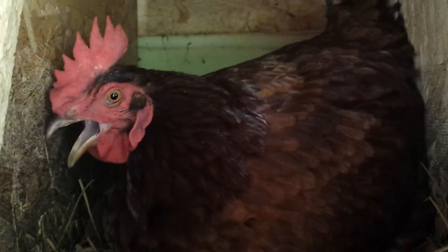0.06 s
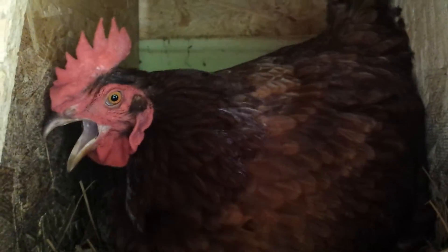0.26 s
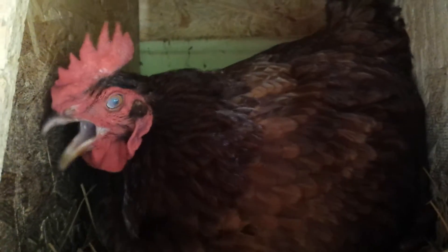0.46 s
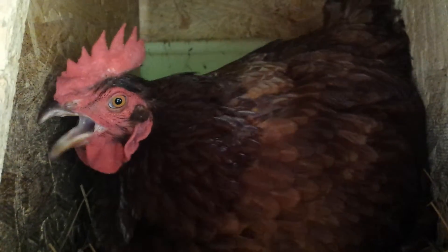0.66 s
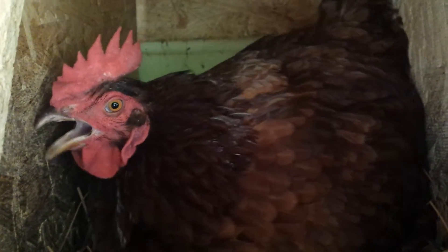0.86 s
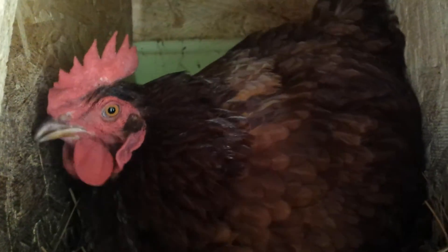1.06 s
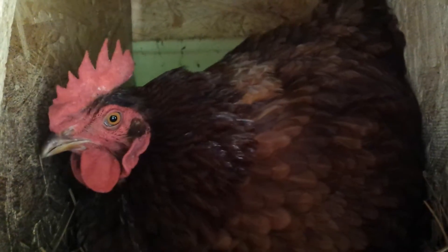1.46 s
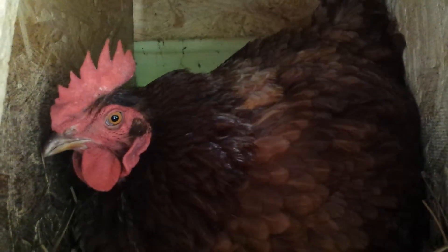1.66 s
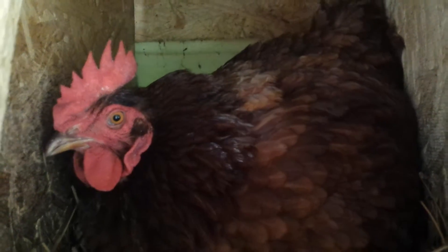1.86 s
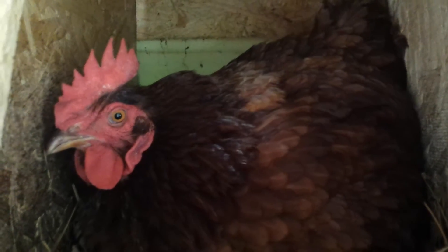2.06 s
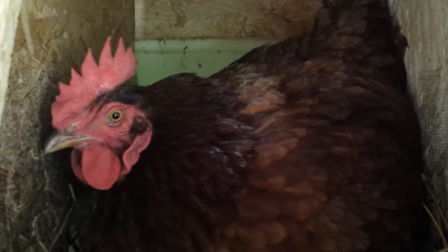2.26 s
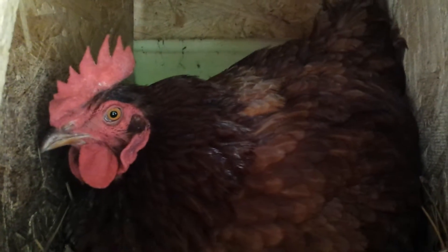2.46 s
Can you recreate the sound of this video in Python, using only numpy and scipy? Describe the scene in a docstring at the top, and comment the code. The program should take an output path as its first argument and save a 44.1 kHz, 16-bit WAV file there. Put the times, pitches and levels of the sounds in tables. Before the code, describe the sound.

A hen close to the microphone gives one long shrill squawk that grows louder, steps down in pitch and breaks into a rasp and a hiss at about 1 second. Short rattling clucks follow from 1.2 to 1.6 seconds. Near 1.8 seconds straw crackles faintly and she bumps softly against the wooden box. A thin soft whine runs from 1.9 to 2.5 seconds. A faint low throb lies underneath.

```python
"""Hen in a nest box

Close on a stereo microphone, a hen on straw in a wooden box gives one long shrill squawk. The tone of
her syrinx steps down in pitch, cracks into pulses and ends in a rasp and a hiss of breath. She clucks
in short rattles, then starts a thin soft whine. Straw rustles as she shifts; a low throb runs beneath."""
import sys
import numpy as np
from scipy import signal
from scipy.fft import rfft, irfft, next_fast_len
from scipy.io import wavfile
from scipy.ndimage import uniform_filter1d, map_coordinates

SR = 44100
rng = np.random.default_rng(int(sys.argv[2]) if len(sys.argv) > 2 else 0)


def dump_mix(stems):
    """Bounce the given channels to the path in sys.argv[1] as a 16-bit WAV at rate SR."""
    frames = np.atleast_2d(stems).T  # one column per channel
    limited = np.clip(frames, -1, 1)  # hard clip at full scale
    pcm = np.round(limited * 32767).astype(np.int16)
    wavfile.write(sys.argv[1], SR, pcm)


N = 110250
T = np.arange(N) / SR

# Pace of the throb: t/s, rate/Hz
THROB_RATE = [(0,9.25),(.9,9.25),(1.5,8.6),(2.5,7.7)]
# Its two modes: t/s, lower relative level/dB, upper relative level/dB
THROB_LEVELS = [(.75,-48.5,-50.5),(1.199,-53.5,-62.5),(2.4,-49.5,-62.5)]
# Their ring: f/Hz, t60/s
THROB_MODES = [(65,0.22),(100,0.38)]
# Background hiss: f/Hz, relative level/dB
FLOOR_COLOUR = [(25,-25),(80,-16.5),(400,-28),(1900,-35),(15500,-43.5)]
# Fundamental of the squawk: t/s, f/Hz, level/dB
SQUAWK_TONE = [(0.02,1224,-37),(0.022,1255,-27.5),(.055,1299,-31.5),(.07,1400,-39),(0.149,1626,-39),(0.184,1504,-31.5),(0.206,1418,-43),
               (0.234,1350,-20.5),(0.259,1415,-27),(.272,1379,-21),(0.285,1413,-37.5),(0.293,1391,-20),(0.337,1315,-19.5),(0.388,1254,-27),(0.408,1276,-19),(0.488,1334,-26.5),(0.541,1194,-18.5),
               (0.547,1048,-13.5),(.585,1075,-11),(0.616,1126,-15.5),(0.632,1161,-24),(.664,1113,-14),(0.683,1166,-26),(.708,1089,-12),(0.737,1130,-28.5),(0.759,1132,-18.5),(0.818,1036,-10.5),(0.829,1038,-23),
               (0.842,1077,-17.5),(.848,699,-21),(0.852,852,-17),(0.868,836,-15),(0.869,1043,-17.5),(0.879,765,-21),(0.889,1093,-11),(0.913,1040,-13.5),(0.919,1016,-59),(0.927,841,-26.5),(0.94,558,-25)]
# Its overtones: t/s, second harmonic level/dB, upper harmonics base level/dB
SQUAWK_EDGE = [(.02,-57.5,-55),(.033,-28,-50),(.1,-41,-45),(.232,-26.5,-44.5),(.31,-35.5,-54.5),(.375,-28.5,-53),(.415,-17.5,-36),(.49,-23.5,-39.5),(.53,-20.5,-34.5),(.56,-27,-35.5),(.61,-31,-48.5),(.74,-30.5,-46.5),(.81,-26,-38),(.835,-43,-52),(.87,-36,-53.5),(.9,-32.5,-57),(.925,-46,-68)]
# Its hoarseness: t/s, roughness/0-1
SQUAWK_ROUGHNESS = [(.05,0.34),(.17,0.58),(.24,0.19),(.55,0.01),(.83,0.16),(.865,0.37),(.9,0.16),(.94,.4)]
# Throat resonances on the upper harmonics: f/Hz, gain/dB
FORMANTS = [(1800,6),(2550,21),(3150,4),(4100,-5),(4700,-24),(6450,-16.5),(7100,-23)]
# Air through the open beak: t/s, relative level/dB
BREATH_LEVEL = [(0,-53.5),(.45,-57),(.9,-47.5),(.95,-41),(.995,-44.5),(1.02,-67)]
# Its spectrum: f/Hz, relative level/dB
BREATH_COLOUR = [(700,4.5),(1650,-1),(2550,17.5),(4600,-14.5),(6350,6),(7600,-3.5),(9700,2),(11300,-9),(13500,-7.5)]
# Ring of the box: f/Hz, t60/s
BOX_DECAY = [(300,0.16),(5000,0.0097)]
# Balance at the microphone: f/Hz, left minus right/dB
BALANCE = [(200,-2.5),(1200,4),(2200,11.5),(6500,6.5),(9000,-9.5)]
# Straw crackles: t/s, relative level/dB, t60/s
CRACKLES = [(0.384,-30.5,0.013),(1.837,-45,0.085),(1.923,-49.5,0.26)]
# Their spectrum: f/Hz, relative level/dB
STRAW_COLOUR = [(1500,-1),(6500,-1.5),(15000,-21.5)]
# Body against the box: t/s, relative level/dB, f/Hz
BUMPS = [(0.406,-44.5,285),(1.731,-46,275),(1.854,-42.5,287),(1.923,-41,255),(2.034,-44.5,171)]
# Crack, closing rasp, first cluck: t/s, length/s, pulse rate/Hz, level/dB, brightness/dB, scatter/cycles
RASPS = [(.852,0.038,418.4,-33.5,-1,0.22),(0.941,0.018,440.8,-18,-1,0.092),(1.2463,0.0038,675,-21,-19,.05),(1.25,0.018,619,-24,-12.5,0.026)]
# Throat in a rasp: f/Hz, gain/dB
RASP_COLOUR = [(150,-19.5),(450,-3),(900,1.5),(1300,-4),(1600,-15),(2500,-6),(3100,-11),(4600,-38.5),(6200,-24),(8000,-41.5)]
# Air with the beak closed: t/s, level/dB
WHEEZE_LEVEL = [(1.3,-67.5),(1.42,-47.5),(1.52,-42.5),(1.88,-65.5),(2.0,-50),(2.11,-44.5),(2.3,-53.5)]
# Its spectrum: f/Hz, relative level/dB
WHEEZE_COLOUR = [(2250,-18.5),(2600,5.5),(2780,-8),(3200,-7.5),(3900,-34.5),(6500,-18),(9000,-35)]
# Clucks: t/s, strength/dB, brightness/dB
CLUCKS = [(1.361,-24.5,-4),(1.382,-17.5,-1),(1.399,-17.5,-8),(1.445,-21,-22),(1.464,-13,-4.5),(1.482,-14,4),(1.549,-17.5,-7),(1.567,-13,-2),(1.610,-9.5,-12.5)]
# Ring of throat and box in a cluck: f/Hz, gain/dB
CLUCK_COLOUR = [(100,-31.5),(290,-5.5),(370,-22),(460,-2.5),(940,-5),(1300,-20),(1700,-34.5),(4050,-26),(4600,-43.5),(9000,-46)]
# Course of the whine: t/s, f/Hz, level/dB, roughness/0-1
WHINE_TONE = [(1.89,817,-42,1),(2.0,910.4,-36.5,.35),(2.11,942.4,-40.5,.4),(2.37,916.8,-34,.15),(2.5,944,-33,0.36)]
# Its harmonics, from the first: relative level/dB
WHINE_HARMONICS = [-2, -26.5, -23, -31, -42, -37.5, -32.5]

FLUTTER_HZ, TREMBLE_DB = 422.4, 1.4  # speed of the voice's roughness; quiver in its level
OVERTONE_FLUTTER = 0.38  # upper overtones break up even where the voice is clear


def amp(db):
    """Decibels to gain."""
    return 10 ** (np.asarray(db) / 20)


def unit(x):
    """Scaled to rms 1."""
    return x / np.sqrt(np.mean(x ** 2) + 1e-20)


def along(points, hz):
    """A table's value at hz, on a log frequency axis."""
    f, v = np.transpose(points)
    return np.interp(np.log(hz + 1), np.log(f + 1), v)


def curves(rows):
    """One value per sample for each column after the time."""
    s, *cols = np.transpose(rows)
    return [np.interp(T, s, c) for c in cols]


def gate(start, end, fade):
    """1 between two times, with soft edges."""
    return np.clip((T - start) / fade, 0, 1) * np.clip((end - T) / fade, 0, 1)


def puff(start, t60, attack):
    """A quick rise and an exponential fall."""
    t = np.maximum(T - start, 0)
    return (1 - np.exp(-t / attack)) * amp(-60 * t / t60)


def wobble(rate):
    """A smooth random curve, rate knots a second."""
    return map_coordinates(rng.standard_normal(N // 8), [T * rate], mode="wrap")


def filtered(x, response):
    """x through a complex frequency response."""
    m = next_fast_len(N + SR // 2)
    return irfft(rfft(x, m) * response(np.fft.rfftfreq(m, 1 / SR)), m)[..., :N]


def noise(colour, channels=1):
    """Coloured noise of rms 1."""
    return unit(filtered(rng.standard_normal((channels, N)), lambda hz: amp(along(colour, hz))))


def background():
    """A low throb that slows and softens, over a faint even hiss."""
    rate, = curves(THROB_RATE)
    beats = np.diff(np.floor(np.cumsum(rate) / SR + .12), prepend=-1)
    modes = [puff(0, t60, 0.004) * np.sin(2 * np.pi * hz * T) for hz, t60 in THROB_MODES]
    rings = [unit(signal.fftconvolve(beats, mode)[:N]) for mode in modes]
    low, high = [amp(db) * ring for db, ring in zip(curves(THROB_LEVELS), rings)]
    throb = filtered(low - high, lambda hz: amp(along([(28, -46), (55, -5), (105, 3)], hz)))
    return throb + amp(-58.5) * (noise(FLOOR_COLOUR) + noise(FLOOR_COLOUR, channels=2))


def squawk(jitter=0.046, richness=0.88, swing_db=2.5, whistle_hz=6473, whistle_db=-43.5):
    """A nearly pure syrinx tone with overtones shaped by the throat; it flutters where it is rough."""
    hz, swell = curves([(s, pitch, amp(db)) for s, pitch, db in SQUAWK_TONE])
    first_db = 20 * np.log10(swell)
    second_db, upper_db = curves(SQUAWK_EDGE)
    rough, = curves(SQUAWK_ROUGHNESS)
    waver = 1 + jitter * rough * wobble(FLUTTER_HZ) + 0.017 * wobble(100)
    phase = 2 * np.pi * np.cumsum(hz * waver) / SR
    # upper overtones rise with each swell of the voice
    upper_db += richness * (first_db - uniform_filter1d(first_db, int(0.1 * SR)))
    overtones = [second_db] + [upper_db + along(FORMANTS, k * hz) for k in range(3, 7)]
    levels = [first_db + TREMBLE_DB * wobble(85.32)] + [db + swing_db * wobble(85) for db in overtones]
    shake = rough * wobble(170)
    tone = 0
    for k, db in enumerate(levels, 1):
        flutter = (0.57 * rough + OVERTONE_FLUTTER * (k > 2)) * wobble(FLUTTER_HZ)
        tone += amp(db) * (1 + shake + flutter) * np.sin(k * phase)
    # a high throat resonance sings when an overtone crosses it
    whistle = sum(np.sin(k * phase) / (1 + ((k * hz - whistle_hz) / 170) ** 2) for k in (4, 5))
    whistle *= amp(whistle_db + swing_db * wobble(54)) * gate(0.026, 0.47, 0.0079)
    grain = 1 + amp(-38) * wobble(1100)
    return np.sqrt(2) * (tone + whistle) * grain * gate(0, 0.96, 0.0041)


def breath():
    """Air through the open beak, strongest as the squawk collapses, ending in a bright hiss."""
    db, = curves(BREATH_LEVEL)
    flow = 0.81 * noise(BREATH_COLOUR) + noise(BREATH_COLOUR, channels=2)
    hiss = amp(-41) * noise([(5000, -15.5), (11000, -2.5)], channels=2)
    return amp(db + 3.5) * flow * gate(0, 1.07, 0.0081) + hiss * gate(0.98, 1.012, 0.0067)


def box(x):
    """The short wooden ring of the nest box, about 3 ms behind the voice."""
    hz, t, spectrum = signal.stft(rng.standard_normal((2, SR // 3)), SR, nperseg=256)
    decay = amp(-60 * t / along(BOX_DECAY, hz)[:, None])
    tail = signal.istft(spectrum * decay, SR, nperseg=256)[1]
    return signal.fftconvolve(np.pad(x, (130, 0))[None], tail / np.linalg.norm(tail[0]), axes=1)[:, :N]


def at_microphone(x, lag_s=.00016):
    """Close placement: the left side hears it slightly later, and the balance varies with frequency."""
    side = np.array([[.5], [-.5]])
    def response(hz):
        gain = amp(side * along(BALANCE, hz))
        return gain / gain.mean(axis=0) * np.exp(-2j * np.pi * hz * side * lag_s)
    return filtered(x, response)


def nest():
    """Straw crackles, and the hen's body bumps softly against the box."""
    straw = noise(STRAW_COLOUR, channels=2)
    straw *= sum(amp(db + 1) * puff(s, t60, attack=0.00018) for s, db, t60 in CRACKLES)
    bumps = 0
    for s, db, hz in BUMPS:
        wood = noise([(hz / 2, -22), (hz, 0), (hz * 1.44, -15), (hz * 3, -16), (hz * 10, -50)])
        bumps += amp(db + 6) * puff(s, t60=0.17, attack=0.0042) * wood
    return at_microphone(straw) + bumps


def throat(colour, bright_db, size=2048):
    """The throat's ring after one pulse, its treble tilted by bright_db."""
    hz = np.fft.rfftfreq(size, 1 / SR)
    db = along(colour, hz) + bright_db * along([(1000, 0.11), (2500, 1)], hz)
    cepstrum = irfft(np.log(amp(db)))
    cepstrum[1:size // 2] *= 2  # folded to minimum phase
    cepstrum[size // 2:] = 0
    return irfft(np.exp(rfft(cepstrum)))


def syrinx_burst(start, length, rate_hz, ring, scatter):
    """A short swell of uneven syrinx pulses through the throat, rms 1 over its length."""
    s = np.arange(0, length, 1 / rate_hz)
    chance = rng.standard_normal((64, 2))[:len(s)]
    size = np.sin(np.pi * (s + .5 / rate_hz) / (length + 1 / rate_hz)) * amp(2.7 * chance[:, 0])
    at = np.round((start + s + scatter * chance[:, 1] / rate_hz) * SR).astype(int)
    voiced = signal.fftconvolve(np.bincount(at, size, N), ring)[:N]
    return voiced / np.sqrt(np.sum(voiced ** 2) / (length * SR))


def rasps():
    """The syrinx drops into slow, hard pulses."""
    return sum(amp(db) * syrinx_burst(s, length, hz, throat(RASP_COLOUR, bright), scatter)
               for s, length, hz, db, bright, scatter in RASPS)


def wheeze():
    """The hen's nasal hiss between and under her calls."""
    db, = curves(WHEEZE_LEVEL)
    return amp(db) * noise(WHEEZE_COLOUR) * gate(0.87, 2.6, .05)


def clucks(pulse_hz=440):
    """Each cluck is a handful of syrinx pulses; stronger ones last longer."""
    rattle = 0
    for s, db, bright in CLUCKS:
        length = max(.012 + .0004 * db, .003)
        ring = throat(CLUCK_COLOUR, bright)
        rattle += amp(db - 9) * syrinx_burst(s, length, pulse_hz, ring, scatter=0.17)
    return rattle


def whine():
    """A thin, trembling closed-beak note that starts hoarse, clears, and turns hoarse again at the end; its
    overtones stay ragged."""
    hz, db, rough = curves(WHINE_TONE)
    waver = 1 + (0.0515 * rough + 0.0089) * wobble(FLUTTER_HZ)
    phase = 2 * np.pi * np.cumsum(hz * waver) / SR
    tone = 0
    for k, level in enumerate(WHINE_HARMONICS, 1):
        flutter = (rough + OVERTONE_FLUTTER * (k > 1)) * wobble(230)
        tone += amp(level) * (1 + flutter) * np.sin(k * phase)
    envelope = amp(db + TREMBLE_DB * wobble(65)) * gate(1.888, 2.6, 0.0089)
    return np.sqrt(2) * envelope * tone / np.sqrt(1 + rough ** 2)


def scene():
    """The hen close by in her box, mostly left of centre; the direct whine reaches both sides alike."""
    call, pulses, soft_call = squawk(), rasps() + clucks(), whine()
    direct = call + pulses + breath() + wheeze()
    box_ring = amp(-17) * box(call + soft_call) + amp(-14.5) * box(pulses)
    return at_microphone(direct + box_ring) + soft_call + nest() + background()


def record(dry, top_hz=15750):
    """The recorder keeps nothing above its band limit."""
    return filtered(dry, lambda hz: hz < top_hz)


dry = scene()
out = record(dry)
dump_mix(out)
```